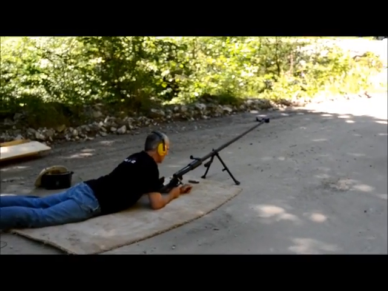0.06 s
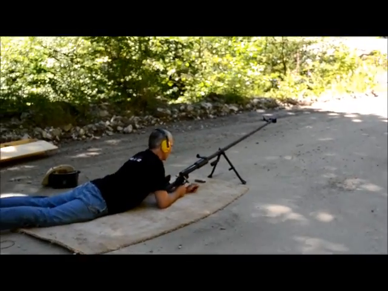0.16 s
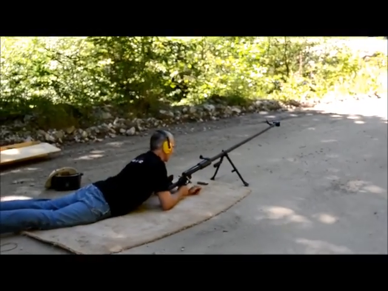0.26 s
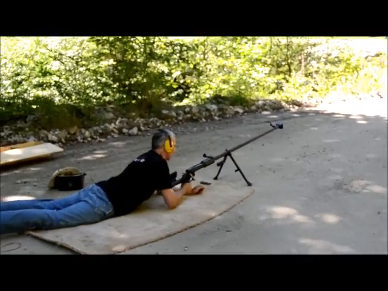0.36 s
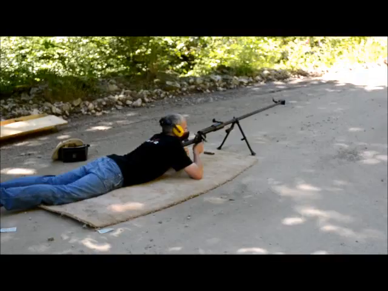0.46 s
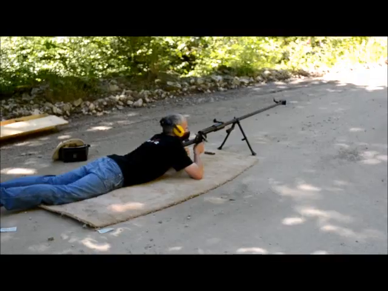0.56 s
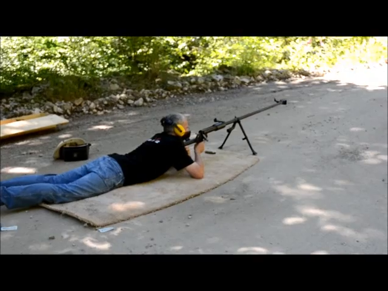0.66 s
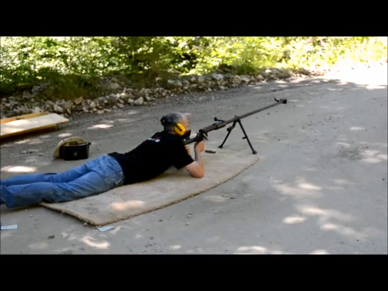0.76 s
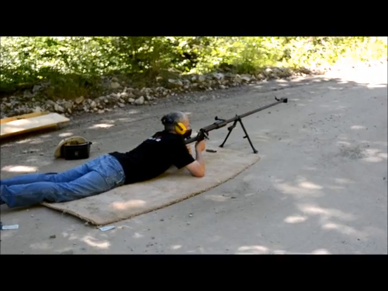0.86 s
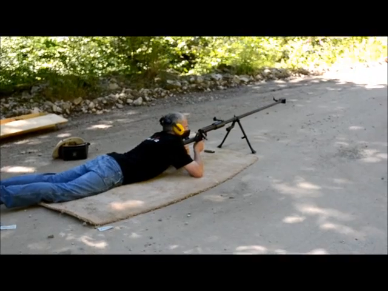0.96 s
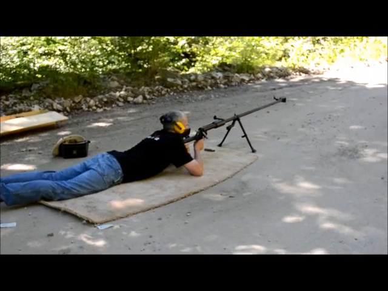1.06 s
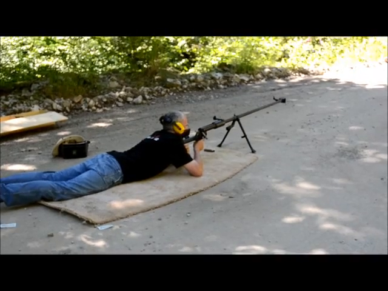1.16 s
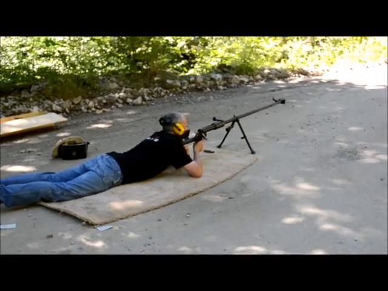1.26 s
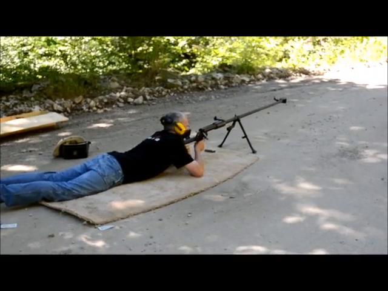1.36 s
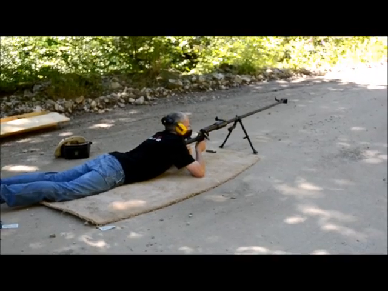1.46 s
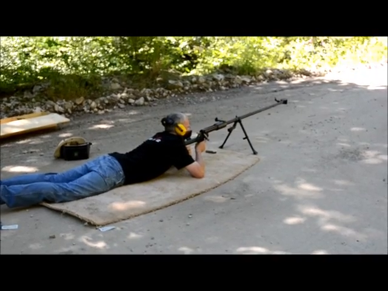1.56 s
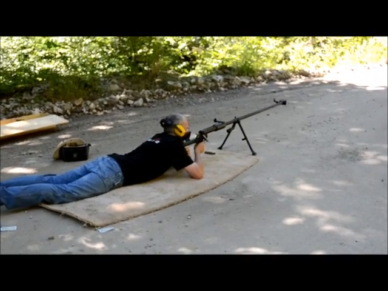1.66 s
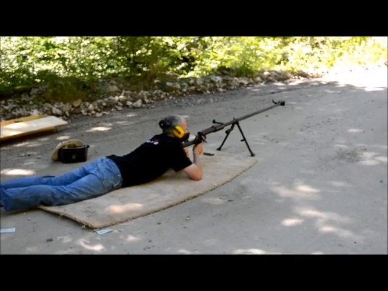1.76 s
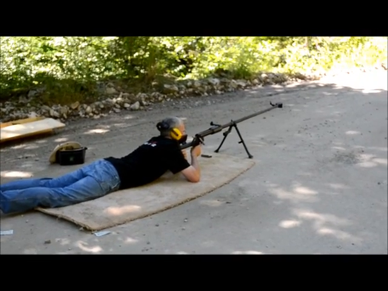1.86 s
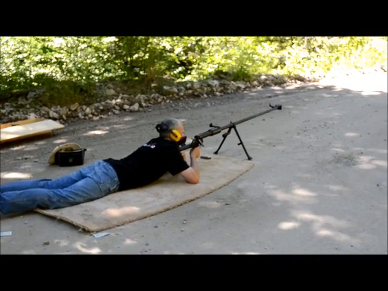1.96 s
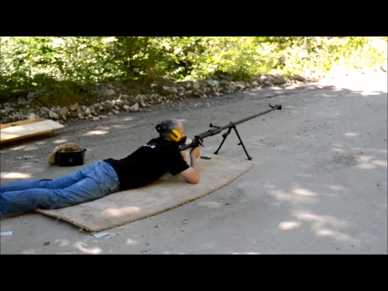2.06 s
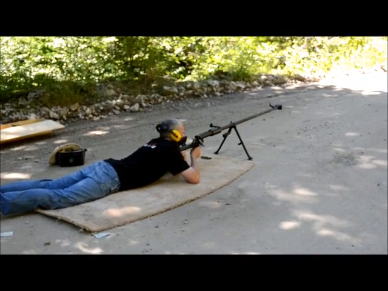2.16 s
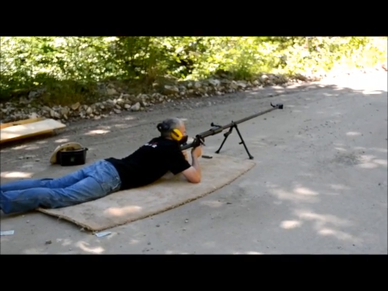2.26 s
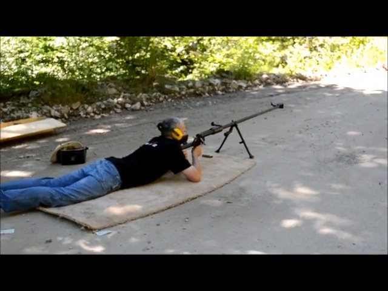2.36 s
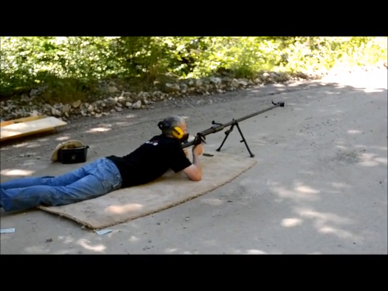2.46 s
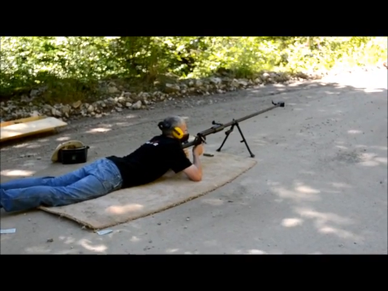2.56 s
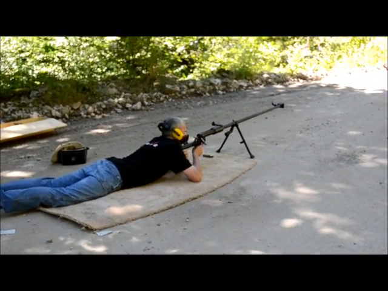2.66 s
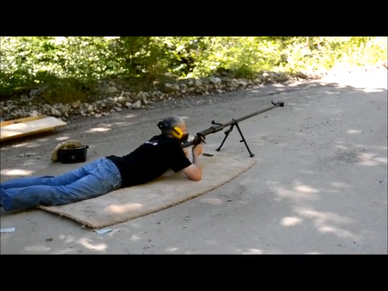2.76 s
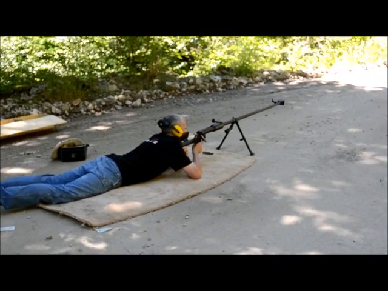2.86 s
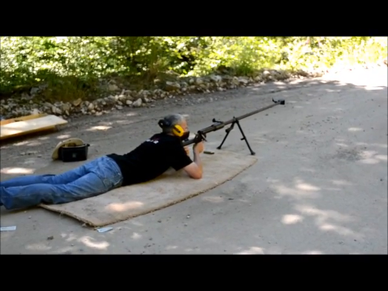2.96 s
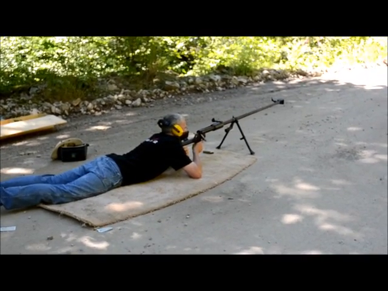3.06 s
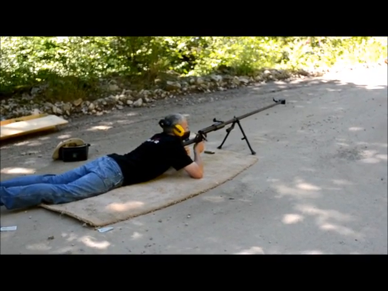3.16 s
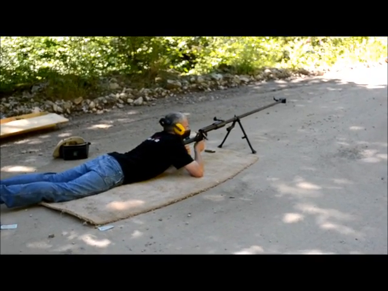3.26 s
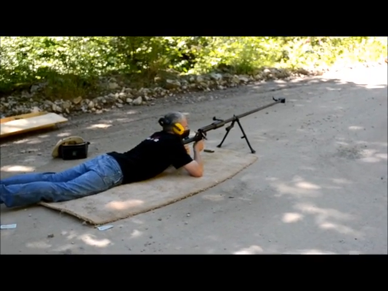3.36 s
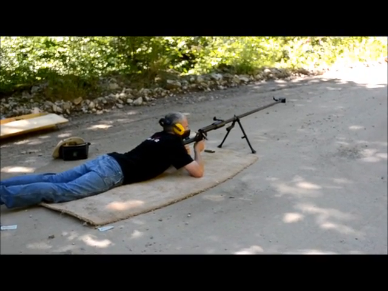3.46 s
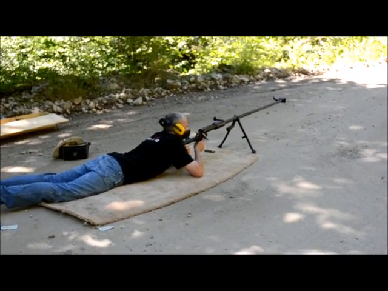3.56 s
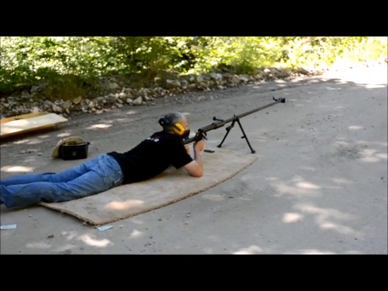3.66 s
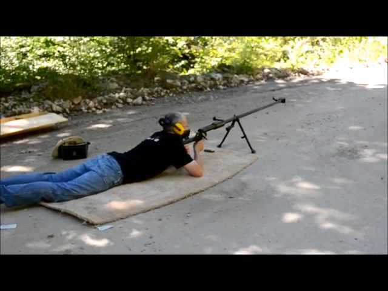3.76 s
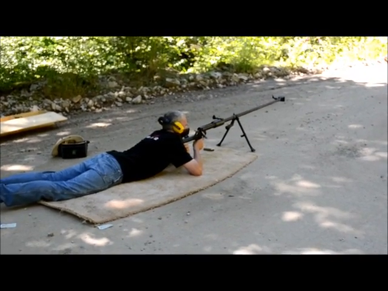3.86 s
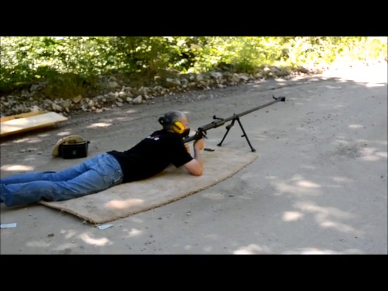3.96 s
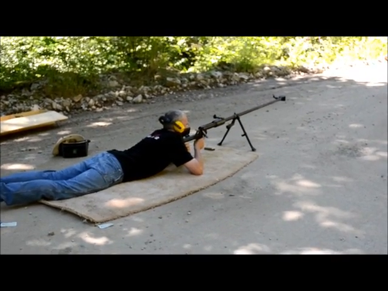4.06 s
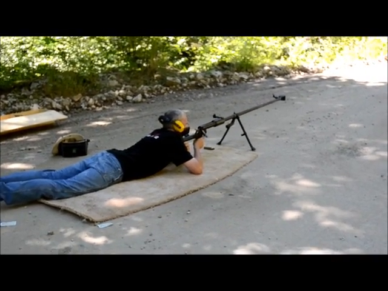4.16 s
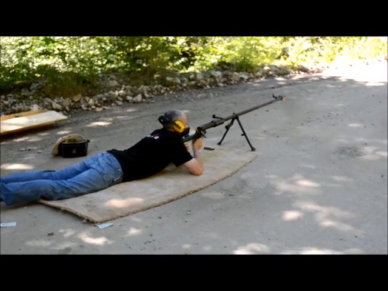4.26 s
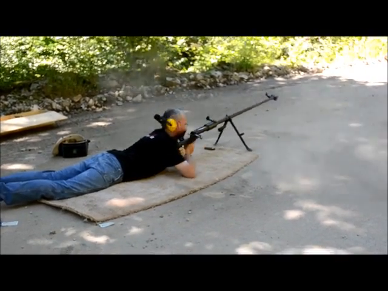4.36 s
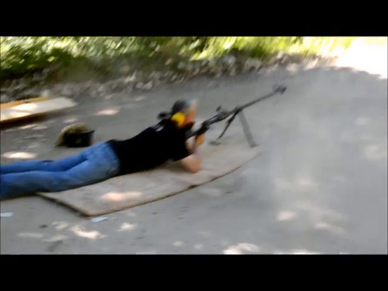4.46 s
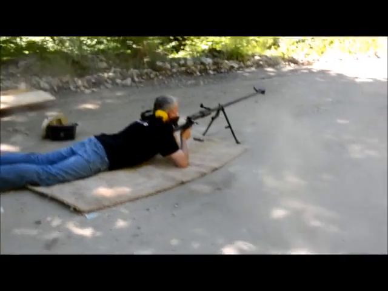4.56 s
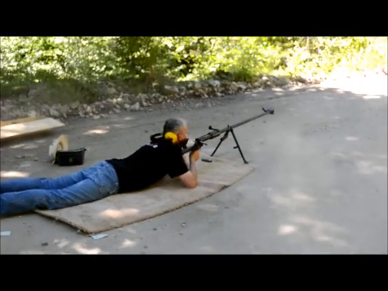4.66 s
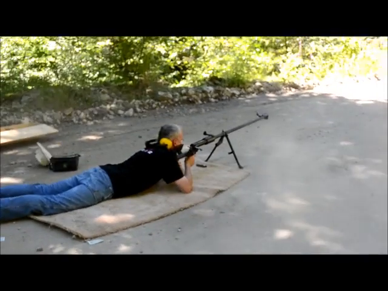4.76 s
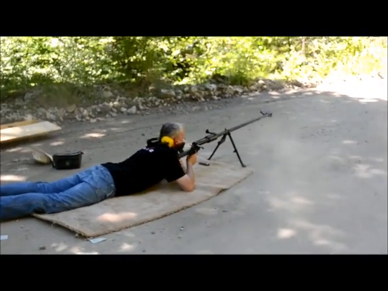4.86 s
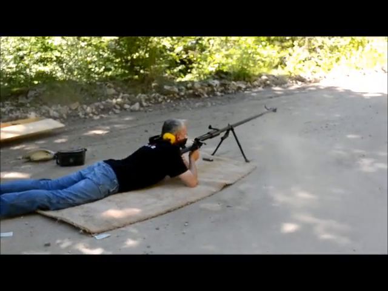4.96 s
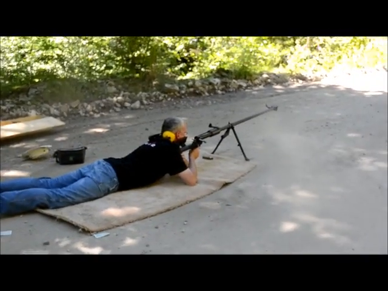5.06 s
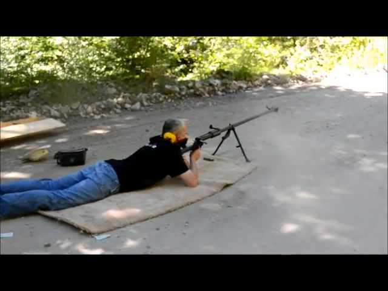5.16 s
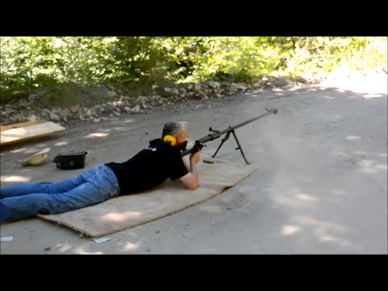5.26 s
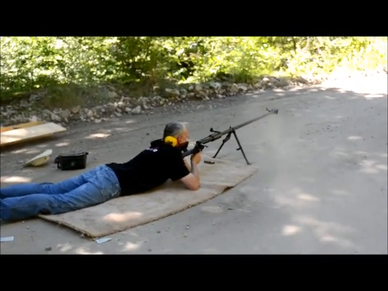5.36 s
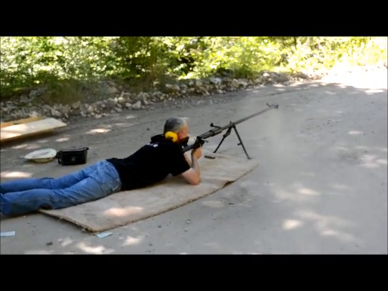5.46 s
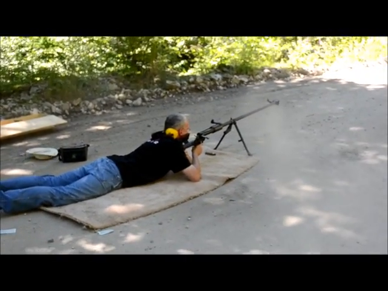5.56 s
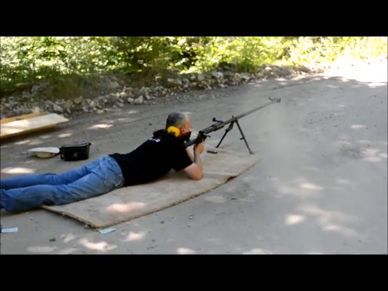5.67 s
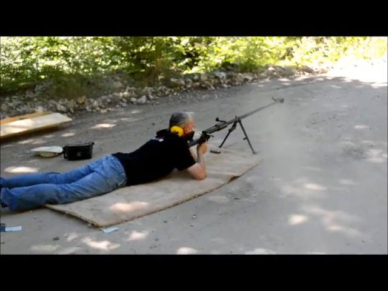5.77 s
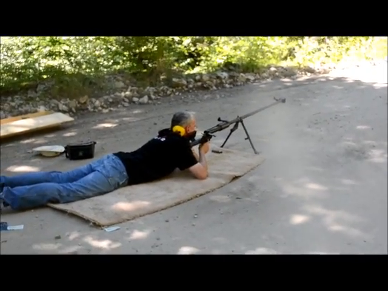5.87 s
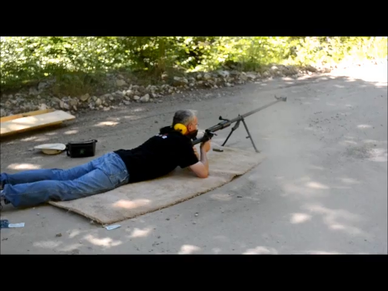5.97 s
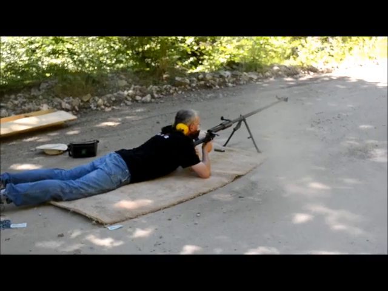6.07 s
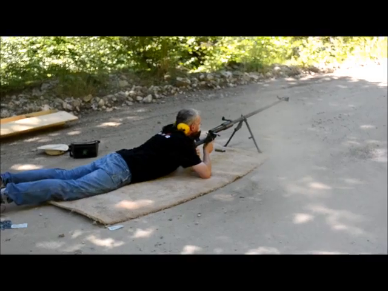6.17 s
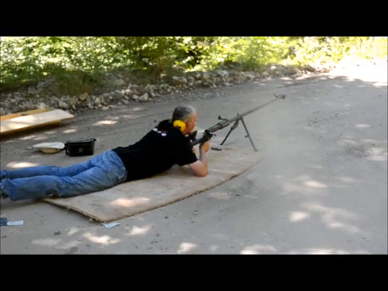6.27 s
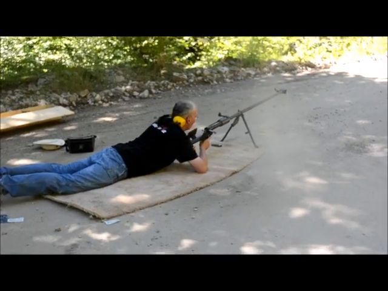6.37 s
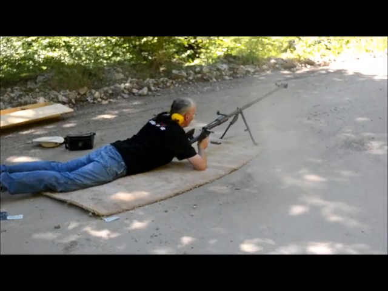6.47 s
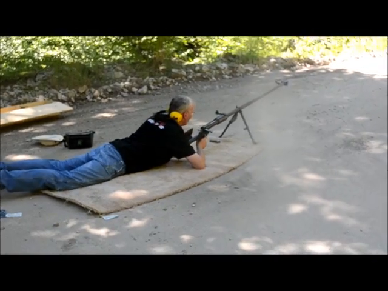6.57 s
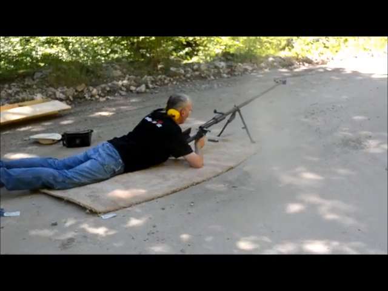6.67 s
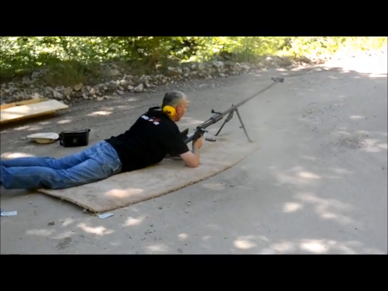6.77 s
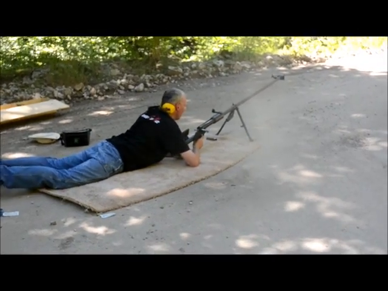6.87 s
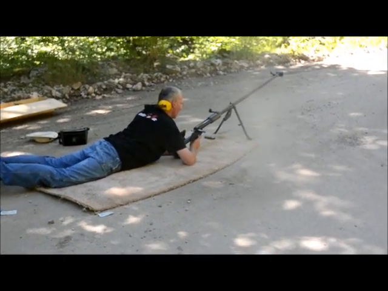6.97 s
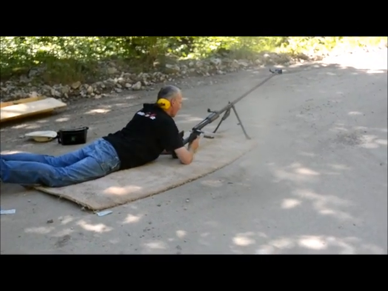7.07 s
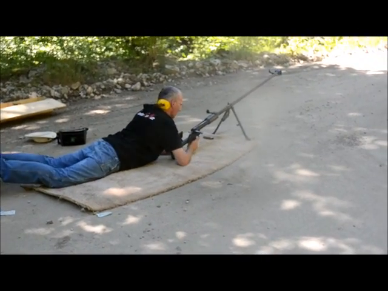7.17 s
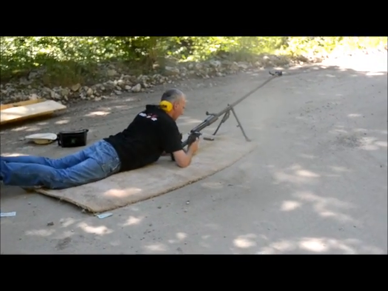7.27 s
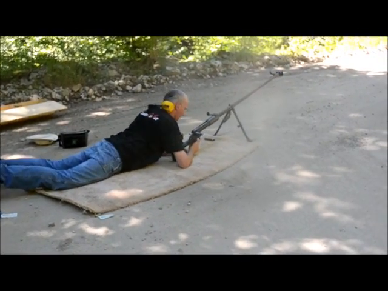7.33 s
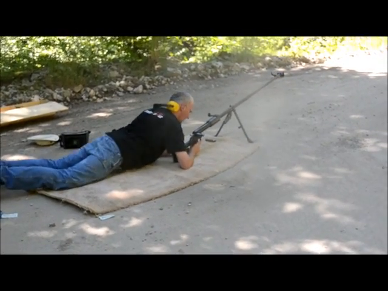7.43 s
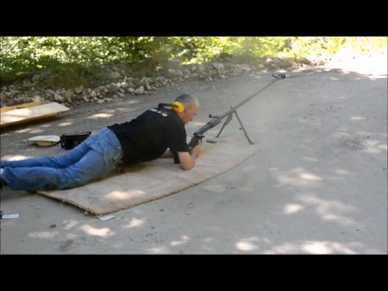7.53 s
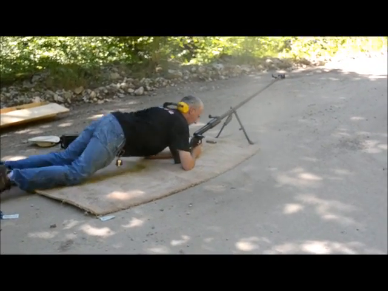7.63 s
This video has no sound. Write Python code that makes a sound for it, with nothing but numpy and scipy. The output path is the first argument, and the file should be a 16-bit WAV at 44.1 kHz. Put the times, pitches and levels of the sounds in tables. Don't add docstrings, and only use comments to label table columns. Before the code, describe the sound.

A steady soft stream-like hiss with faint handling thuds, then one huge overloaded rifle shot and a long rolling echo off trees, fading back to hiss.

```python
import sys
import numpy as np
from scipy import signal
from scipy.fft import irfft
from scipy.io import wavfile
from scipy.ndimage import uniform_filter1d

SR = 44100
rng = np.random.default_rng(int(sys.argv[2]) if len(sys.argv) > 2 else 0)


def transcribe(signal):
    frames = np.atleast_2d(signal).T
    limited = np.clip(frames, -1, 1)
    pcm = np.round(limited * 32767).astype(np.int16)
    wavfile.write(sys.argv[1], SR, pcm)


def decibels_to_gain(level_db):
    exponent = np.asarray(level_db, float) / 20
    return 10 ** exponent


N = 339567

SHOT_S = 4.3450

# pitch_hz, level_db (per Hz)
STREAM_TONE = [(30, -15), (130, -14), (300, -5), (620, -1), (1330, -0.5), (2000, -1), (2900, -4),
               (3500, -6), (4600, -8.5), (6000, -10.5), (7900, -15.5), (9500, -13.5), (10400, -19),
               (11300, -34)]
# start_s, peak_db, pitch_hz
THUDS = [(.01, -40, 40), (.15, -39, 70), (.28, -46, 55), (.575, -50, 45), (.66, -52, 60), (.75, -52, 50),
         (.84, -50, 45), (.98, -52, 45), (2.65, -55, 40), (5.95, -48, 40), (6.2, -46, 40)]
# start_s, peak_db, pitch_hz
TICKS = [
    (7.3612, -30, 9600),
    (7.6354, -26, 9900),
]
# pitch_hz, level_db (per Hz)
ECHO_TONE = [(30, -26), (100, -13.5), (190, -1.5), (300, 0), (650, -2.5), (900, -5), (1440, -5.5),
             (2500, -8.5), (4100, -12.5), (6000, -16), (7800, -19.5), (9300, -18.5), (10400, -21.5),
             (11300, -36)]
# pitch_hz, width_hz, growth_db_per_s
VALLEY = (840, 130, 1.33)
# loudest_s, level_db, swell_db_per_s, fade_db_per_s, boom_db
BANKS = [
    (4.41, -16.5, 110, 23, -7),
    (4.53, -15.5, 40, 31, -7),
    (5.17, -13, 1.5, 30.5, -8),
    (5.62, -31, 28, 5.5, 0.5),
    (6.18, -26, 40, 52, -7),
    (6.43, -26.5, 16, 11.5, -3),
]
# pitch_hz, level_db (per Hz)
JET_TONE = [(180, -31), (300, -9), (4600, -8.5), (6050, -9.5), (7480, -14), (9540, -7), (11300, -26),
            (14700, -50), (22000, -120)]
# start_s, peak_db, length_ms
SHOCKS = [(4.3529, 2, .16), (4.3537, -2, .15), (4.3563, 1, .15), (4.3589, 2, .17), (4.3611, 2, .17),
          (4.3651, 1, .17), (4.3701, 2, .19), (4.3716, -2, .15), (4.3731, -2, .32), (4.3747, -2, .24),
          (4.3771, -4, .28), (4.3815, -3, .15), (4.3851, -4, .28), (4.3883, -3, .22), (4.3992, -4, .15)]
# pitch_hz, width_hz, depth_db
PORT_DIPS = [(465, 185, -5), (1030, 104, -2.5), (390, 79, -1), (7890, 180, -9.5)]


def evened(x):
    return x / np.sqrt(np.mean(x ** 2) + 1e-20)


def read(points, hz):
    point_hz, value = np.transpose(points)
    return np.interp(np.log(hz + 1), np.log(point_hz + 1), value)


def add(mix, start_s, sound):
    part = mix[round(start_s * SR):][:len(sound)]
    part += sound[:len(part)]


def shaped(x, field_db):
    hz, t, z = signal.stft(x, SR, nperseg=1024, noverlap=768)
    z = z * decibels_to_gain(field_db(hz[:, None], t[None]))
    return signal.istft(z, SR, nperseg=1024, noverlap=768)[1][:N]


def patches(hz, t, bins, frames):
    field = rng.standard_normal((t.size, hz.size)).T
    field = uniform_filter1d(field, int(bins), 0)
    return evened(uniform_filter1d(field, int(frames), 1))


def stream():
    def field_db(hz, t):
        drift_db = 0.38 * patches(hz, t, 14, 14) + 0.14 * patches(hz, t, 380, 25)
        return read(STREAM_TONE, hz) + drift_db
    hiss = evened(shaped(rng.standard_normal(N), field_db))
    return decibels_to_gain(-37) * hiss


def handling_thuds():
    out, t = np.zeros(N), np.arange(SR // 10) / SR
    for start_s, peak_db, pitch_hz in THUDS:
        swell = t / 0.011 * np.exp(1 - t / 0.0077)
        add(out, start_s, decibels_to_gain(peak_db) * np.sin(2 * np.pi * pitch_hz * t) * swell)
    return out


def bolt_ticks():
    out, t = np.zeros(N), np.arange(SR // 10) / SR
    for start_s, peak_db, pitch_hz in TICKS:
        add(out, start_s, decibels_to_gain(peak_db - 60 * t / 0.005) * np.sin(2 * np.pi * pitch_hz * t))
    return out


def banks_db(t, bass):
    loudest_s, level_db, swell, fade, boom_db = np.transpose(BANKS)[..., None]
    late = t.ravel() - loudest_s
    if bass:
        level_db = level_db + boom_db
        fade = fade * 0.98
    each_db = level_db + swell * np.minimum(late, 0) - fade * np.maximum(late, 0)
    return 10 * np.log10(np.sum(decibels_to_gain(each_db) ** 2, axis=0)).reshape(t.shape)


def echo():
    air_db_per_s, leaf_db, leaf_s = 9.5, 7, 1.65
    bass_late_db, bass_build_s = -10, .045
    fill_s, missing = .04, .38
    valley_hz, valley_width_hz, valley_db_per_s = VALLEY

    def field_db(hz, t):
        since = np.maximum(t - SHOT_S, 0)
        loss_db = air_db_per_s * since + leaf_db * (1 - np.exp(-since / leaf_s))
        loss_db = loss_db * (hz / 4000) ** 1.127
        bass_db = banks_db(t, True) - banks_db(t, False)
        bass_db = bass_db + bass_late_db * np.exp(-since / bass_build_s)
        boom_db = bass_db / (1 + (hz / 400) ** 2)
        slopes_db = valley_db_per_s * since / (1 + (2 * (hz - valley_hz) / valley_width_hz) ** 2)
        return read(ECHO_TONE, hz) - loss_db + boom_db + slopes_db + 0.67 * patches(hz, t, 5.7, 7.7)

    strength = decibels_to_gain(2.5 * np.minimum(rng.exponential(1, N), 5))
    trunks = evened(strength * rng.standard_normal(N))
    scattered = shaped(trunks, field_db)
    first_half_second = scattered[round(SHOT_S * SR):][:SR // 2]
    steady = scattered / np.sqrt(np.mean(first_half_second ** 2))
    t = np.arange(N) / SR
    onset = np.clip((t - SHOT_S) / 0.004, 0, 1)
    filling = 1 - missing * np.exp(-(np.maximum(t - SHOT_S, 0) / fill_s) ** 2)
    return steady * onset * filling * decibels_to_gain(banks_db(t, False) + 1.0)


def gas_jet():
    level_db, rise_s, fade_db_per_s, length_s = -5, .0047, 760, .05
    out, t = np.zeros(N), np.arange(round(length_s * SR)) / SR
    roar = evened(shaped(rng.standard_normal(N), lambda hz, s: read(JET_TONE, hz) + 0 * s))
    rise = np.minimum(t / rise_s, 1) ** 0.48
    fade = decibels_to_gain(level_db - fade_db_per_s * np.maximum(t - rise_s, 0))
    add(out, SHOT_S, roar[:len(t)] * rise * fade)
    return out


def shock_fronts():
    out = np.zeros(N)
    for start_s, peak_db, length_ms in SHOCKS:
        u = np.arange(400) / SR * 1000 / length_ms
        front = np.sin(1.5 * u) * u * np.exp(-.75 * u)
        add(out, start_s, decibels_to_gain(peak_db) * front / front.max())
    return out


def scene():
    background = stream() + handling_thuds() + bolt_ticks()
    return (background + echo() + gas_jet() + shock_fronts())[None]


def low_pass(x):
    return signal.sosfilt(signal.butter(12, 11420, fs=SR, output="sos"), x)


def record(dry):
    blasted, settled, settle_s = 1.16, .95, .016
    limit = np.where(np.arange(N) / SR < SHOT_S + settle_s, blasted, settled)
    squashed = dry / (1 + abs(dry / limit) ** 4) ** (1 / 4)
    low_hz, edge_hz = 82, 11900
    hz = np.fft.rfftfreq(4096, 1 / SR)
    colour_db = -70 / (1 + np.exp((edge_hz - hz) / 120))
    for pitch_hz, width_hz, depth_db in PORT_DIPS:
        colour_db += depth_db / (1 + (2 * (hz - pitch_hz) / width_hz) ** 2)
    colour = decibels_to_gain(colour_db) * hz ** 2 / (hz ** 2 + low_hz ** 2)
    taps = np.roll(irfft(colour), 2048) * np.hanning(4096)
    heard = signal.oaconvolve(squashed, taps[None], "same")
    return low_pass(np.clip(heard, -1, 1))


dry = scene()
out = record(dry)
transcribe(out)
```